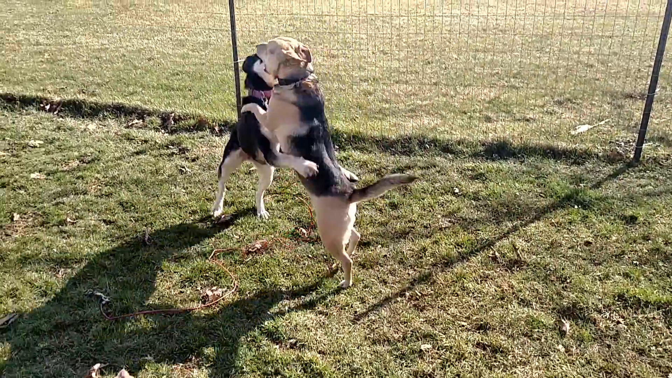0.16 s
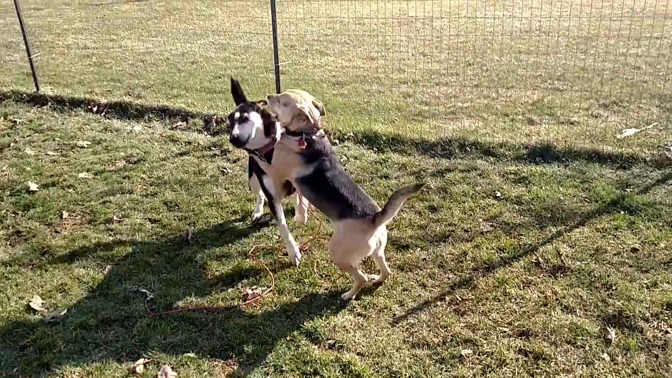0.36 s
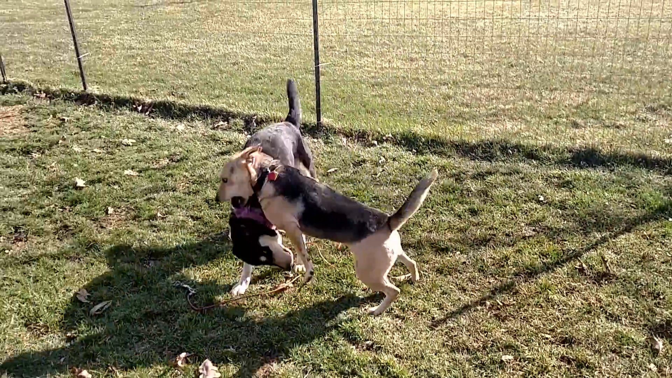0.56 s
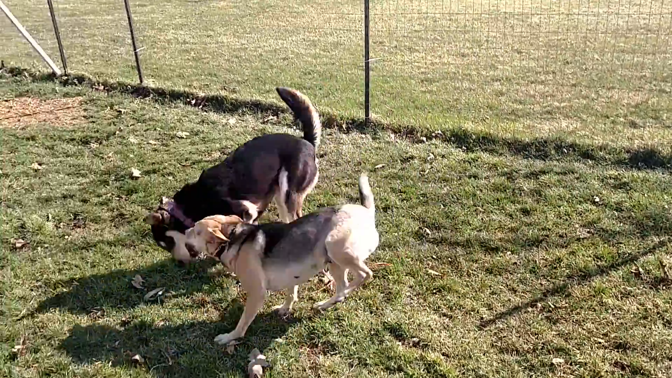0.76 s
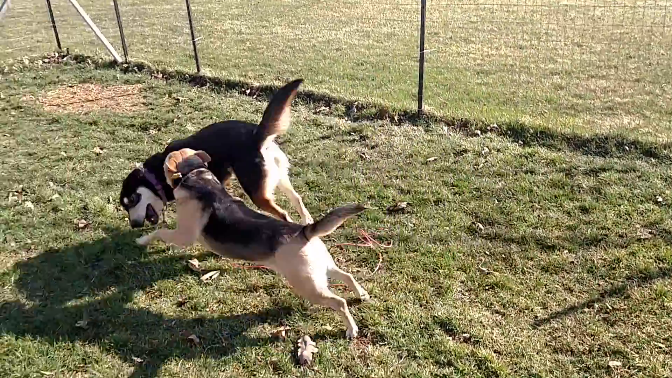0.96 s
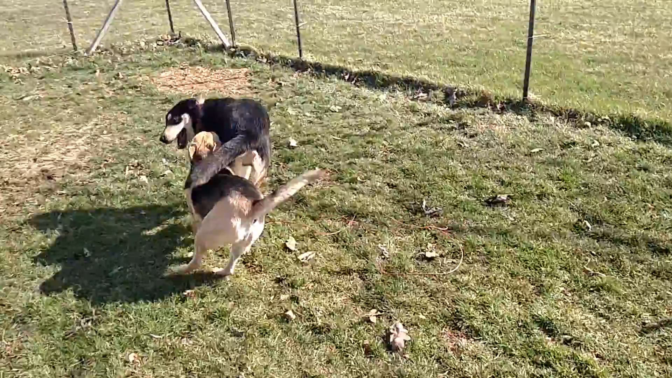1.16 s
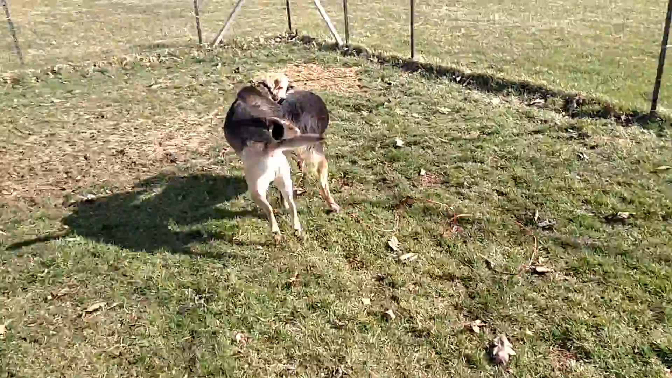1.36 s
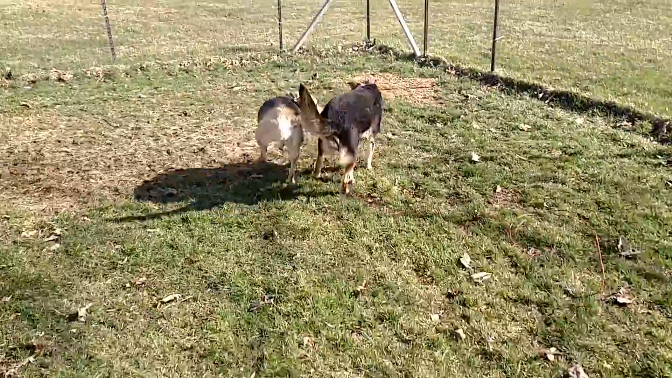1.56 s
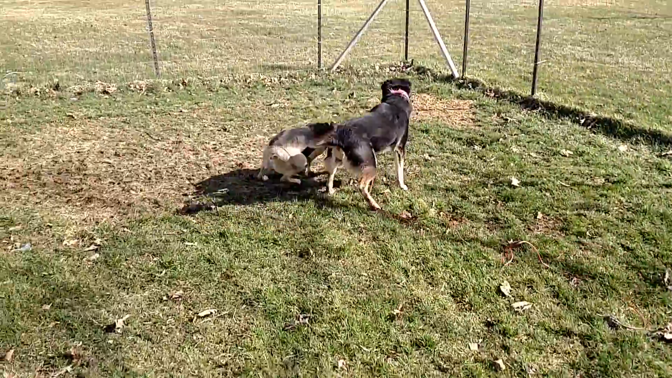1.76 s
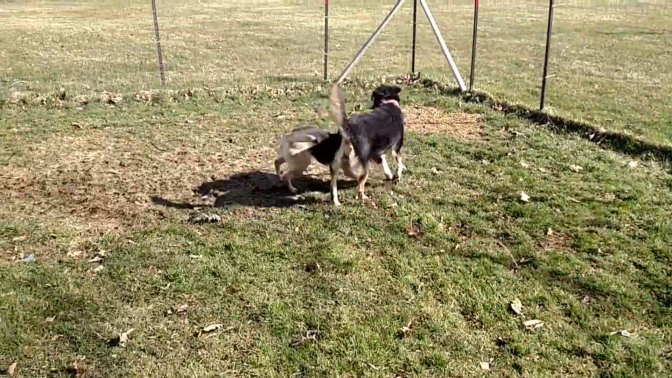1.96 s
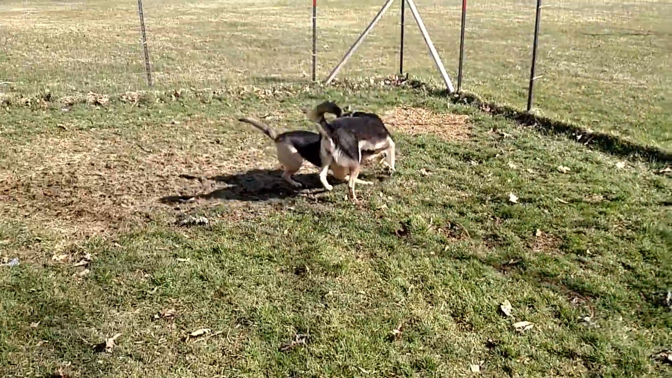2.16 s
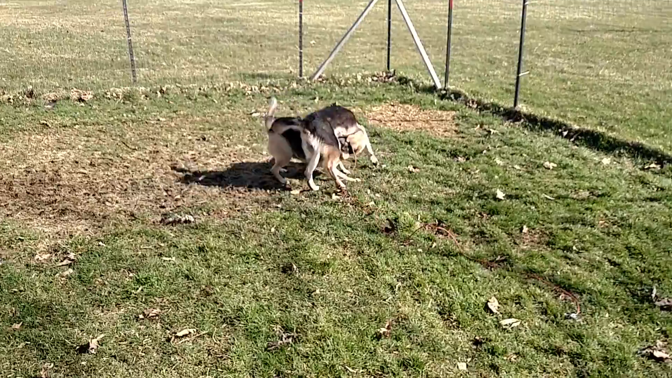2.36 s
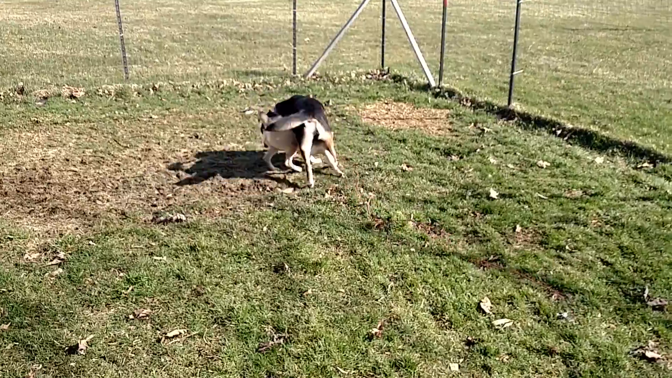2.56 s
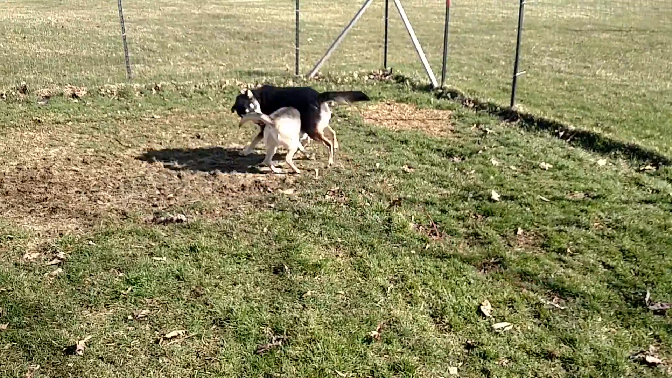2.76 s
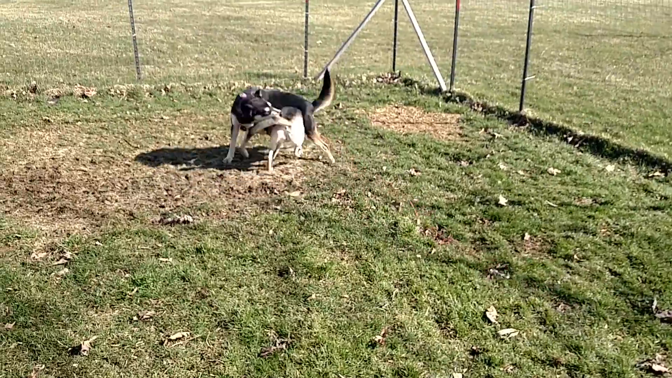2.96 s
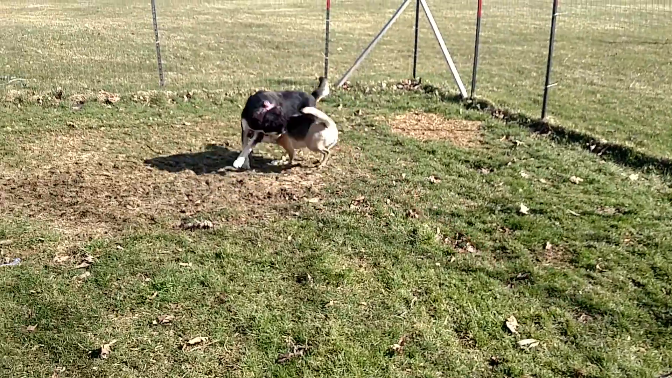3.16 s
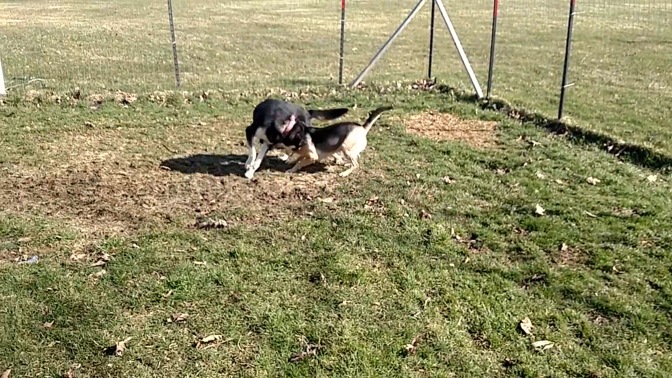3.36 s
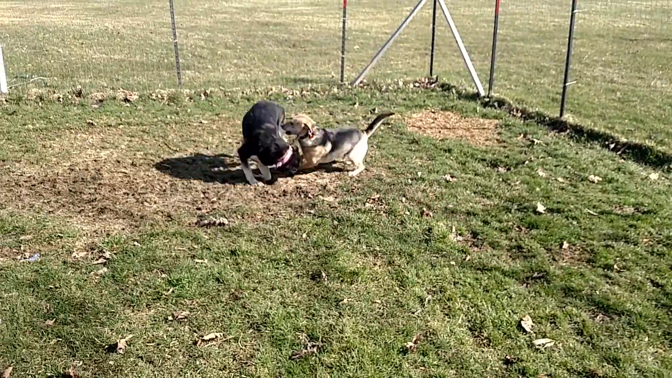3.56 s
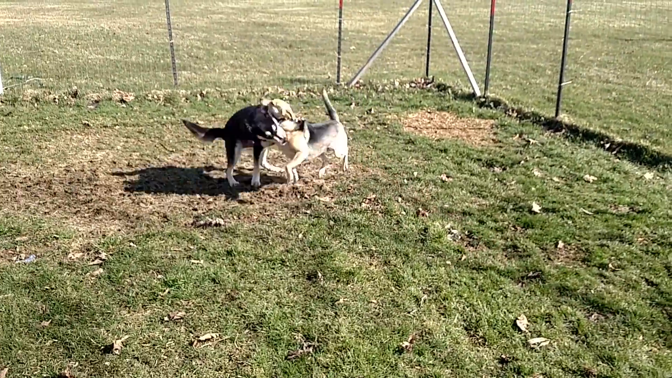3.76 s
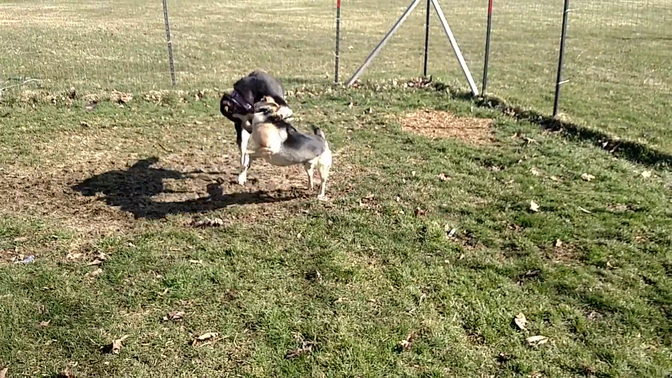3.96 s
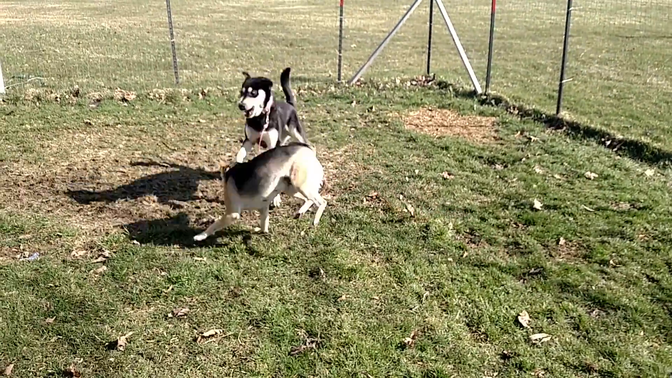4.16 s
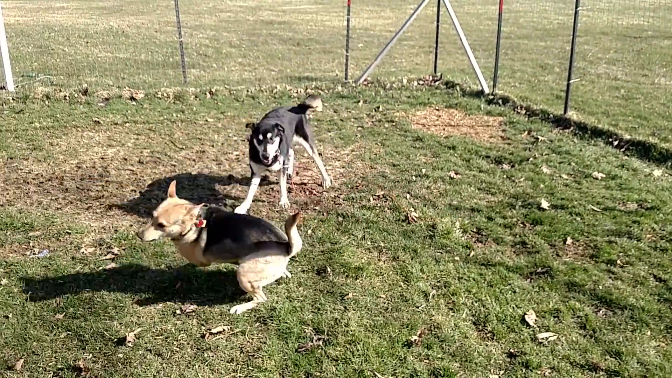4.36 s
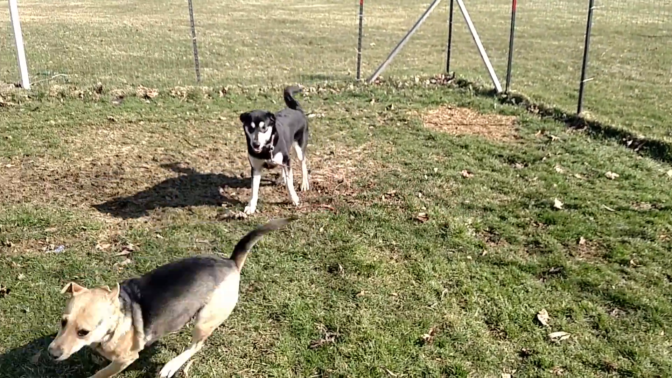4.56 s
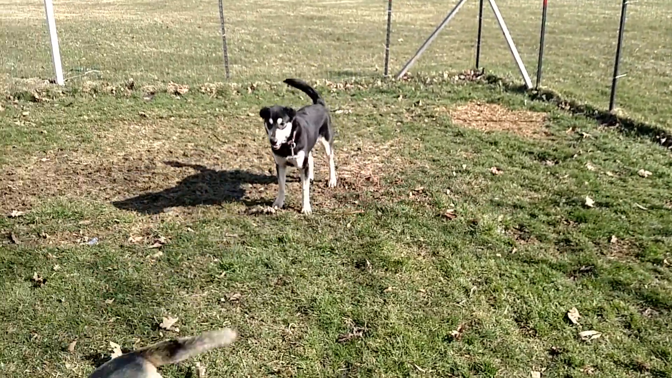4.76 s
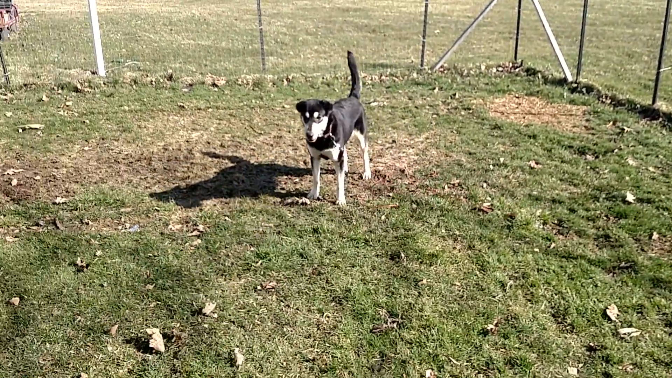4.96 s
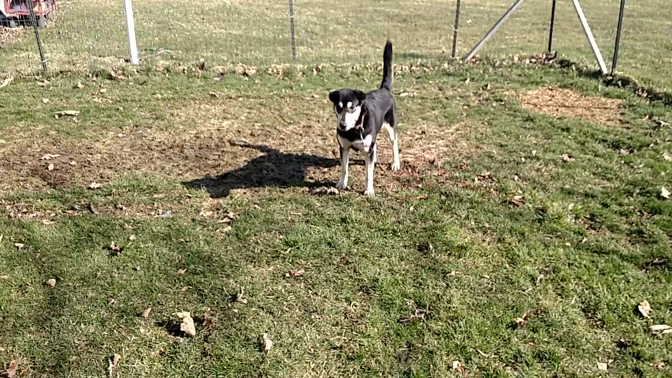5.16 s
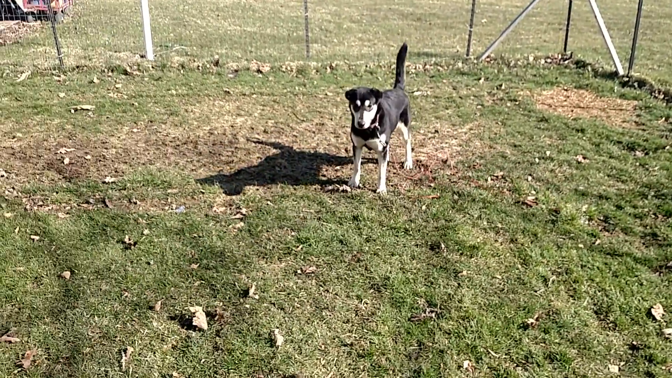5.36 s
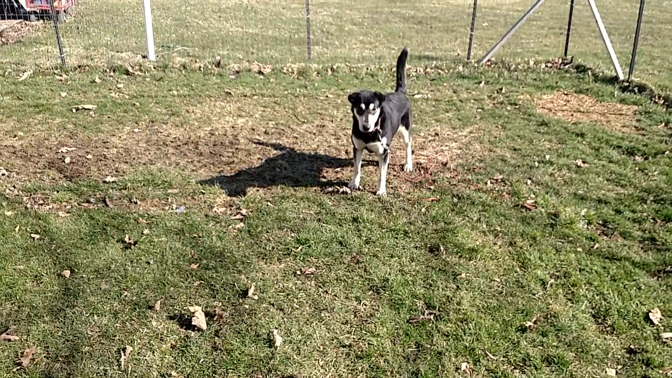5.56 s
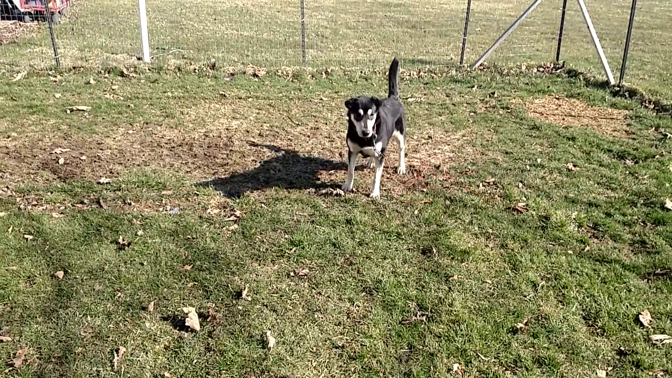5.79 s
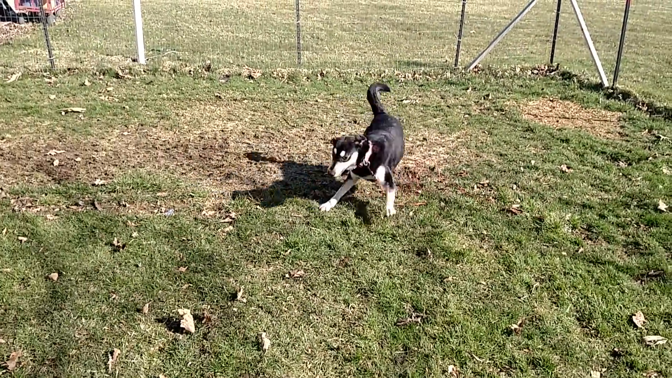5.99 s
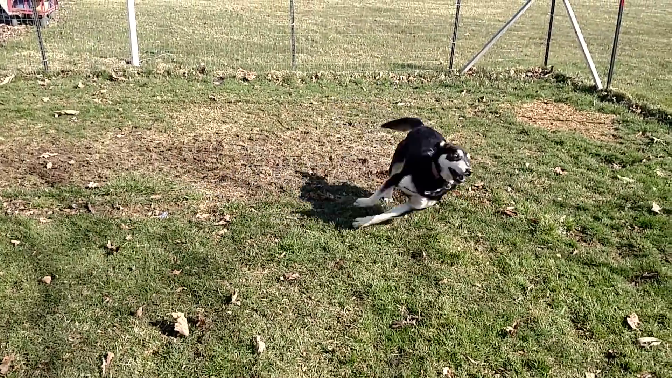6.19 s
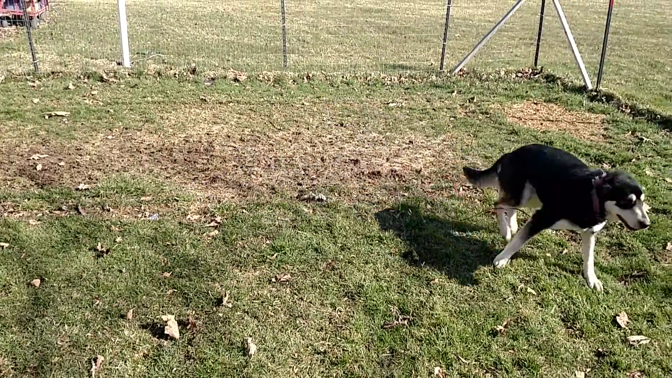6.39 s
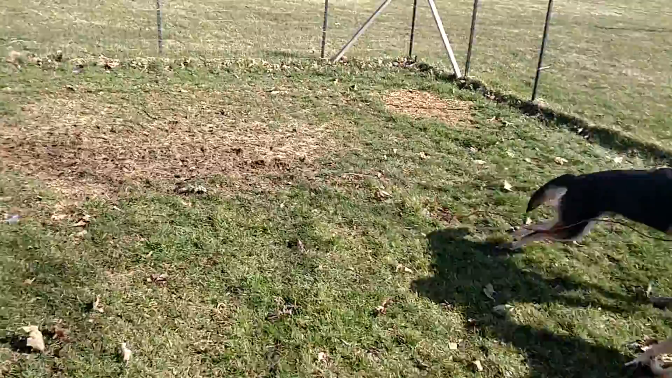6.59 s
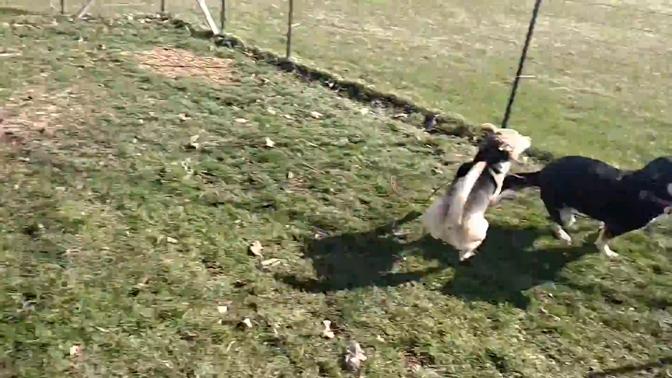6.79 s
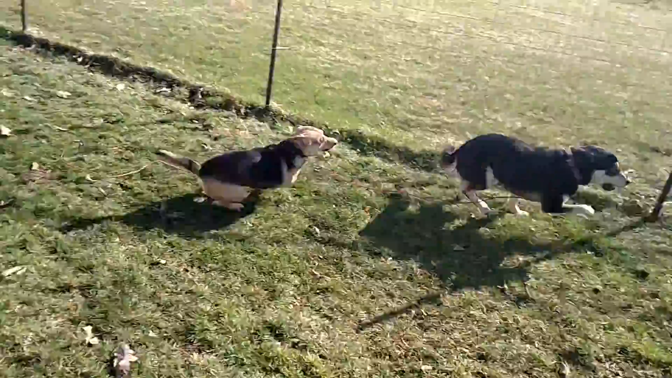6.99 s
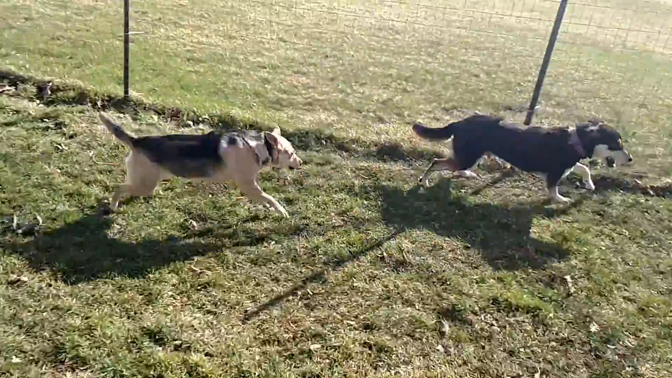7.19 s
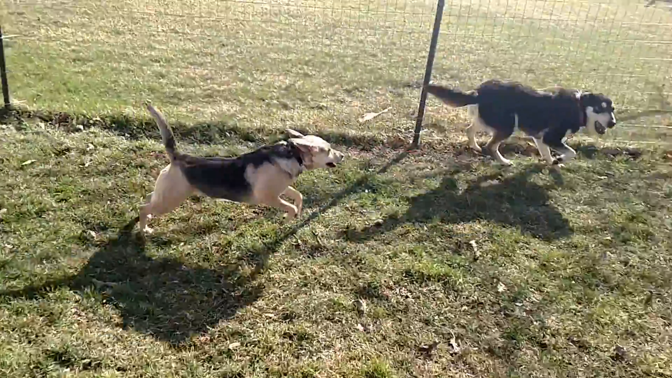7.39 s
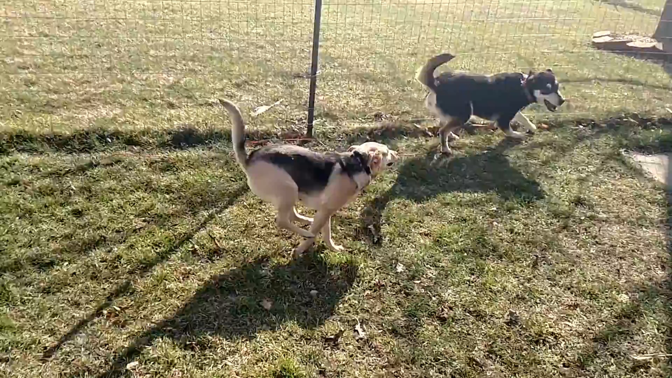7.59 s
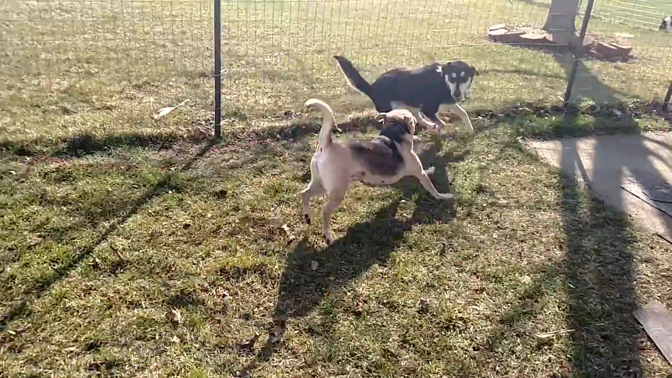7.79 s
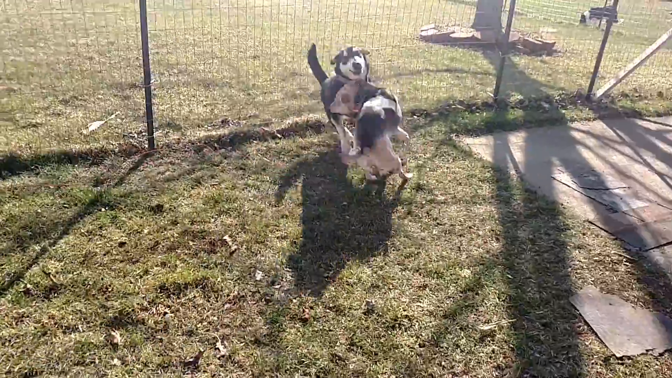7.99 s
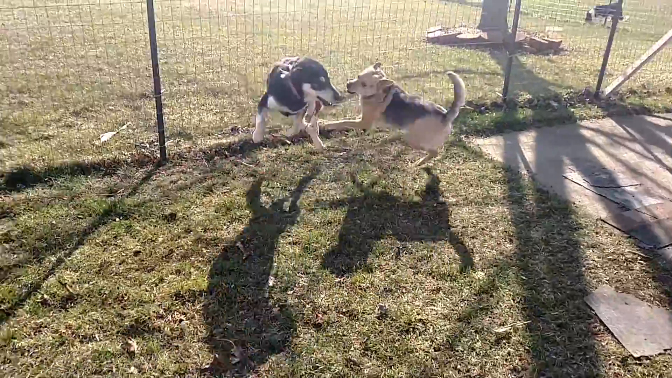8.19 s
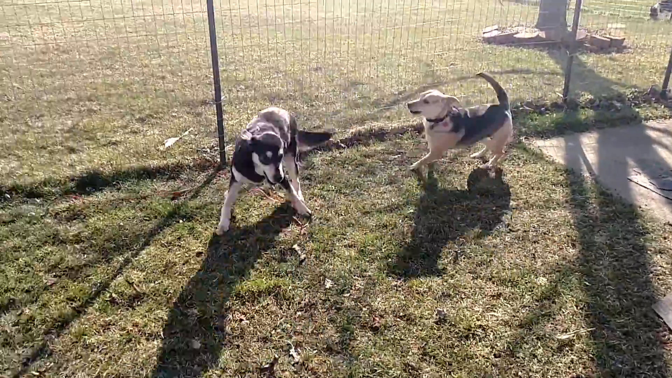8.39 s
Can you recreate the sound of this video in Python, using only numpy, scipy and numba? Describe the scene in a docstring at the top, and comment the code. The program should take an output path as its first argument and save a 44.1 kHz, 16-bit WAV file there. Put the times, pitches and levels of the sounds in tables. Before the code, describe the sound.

Raspy, throaty dog growls tumble over rustling grass outdoors, pause for short breathy pants and microphone buffeting, then flare up again.

```python
"""On a lawn of dry grass two dogs wrestle near the microphone: rough growls in bursts, panting between them.
Growls and pants are flaps and breath noise ringing in throat and mouth cavities; the ground adds a weak echo.
Paws rustle and snap the grass as shaped noise, and a collar tag clinks as ringing metal modes.
Wind buffets the microphone as low noise and single swings; a small bird whistles far off in gliding sines.
Under it all lies a faint outdoor hush of coloured noise."""
import sys
import numpy as np
from scipy import signal
from scipy.fft import rfft, irfft, next_fast_len
from scipy.io import wavfile
from scipy.ndimage import uniform_filter1d
from numba import njit

SR = 44100
rng = np.random.default_rng(int(sys.argv[2]) if len(sys.argv) > 2 else 0)


def boost(x):
    """Linear amplitude factor 10**(x/20) for a level x in decibels (scalar or array-like)."""
    u = np.asarray(x, float) / 20
    return 10 ** u


def transcribe(signal):
    """Save signal, clipped to [-1, 1], as a 16-bit WAV file at the path in sys.argv[1]."""
    frames = np.atleast_2d(signal).T
    limited = np.clip(frames, -1, 1)
    pcm = np.round(limited * 32767).astype(np.int16)
    wavfile.write(sys.argv[1], SR, pcm)


N = 372204

# Growls, level of the mouth resonance: start_s, crest_s, end_s, crest_db, end_db
GROWL_BURSTS = [(0.0, 0.004, 0.265, -26.5, -28.5), (0.268, 0.335, 0.47, -26, -46),
                (0.505, 0.53, 0.81, -34, -41), (0.823, 0.86, 0.935, -23, -31),
                (0.94, 0.955, 1.02, -28, -32), (1.024, 1.04, 1.19, -26, -36),
                (1.193, 1.228, 1.355, -30.5, -38), (1.395, 1.55, 1.655, -34, -43),
                (1.693, 1.71, 2.165, -31, -41), (2.21, 2.23, 2.43, -43, -51),
                (2.495, 2.525, 2.66, -32.5, -52), (2.668, 2.71, 2.985, -39.5, -45),
                (3.098, 3.125, 3.14, -53, -60), (3.187, 3.22, 3.24, -49, -58), (3.34, 3.348, 3.7, -43, -42),
                (3.703, 3.712, 3.762, -37, -43), (3.805, 3.814, 3.94, -41, -56),
                (4.075, 4.092, 4.16, -48.5, -54), (6.262, 6.291, 6.35, -40, -54),
                (6.398, 6.41, 6.56, -34, -32), (6.563, 6.567, 6.73, -39, -39),
                (6.737, 6.745, 6.88, -26.5, -28), (6.922, 6.955, 7.025, -32, -41),
                (7.074, 7.11, 7.16, -41, -53), (7.265, 7.33, 7.365, -36, -43),
                (7.367, 7.37, 7.498, -47, -51), (7.501, 7.56, 7.65, -43, -52),
                (7.738, 7.744, 7.84, -43, -45), (7.872, 7.88, 7.94, -34, -39),
                (7.943, 7.955, 8.104, -37, -35), (8.106, 8.111, 8.28, -18, -26),
                (8.282, 8.284, 8.45, -27, -31)]
# The vocal folds: time_s, mean flap_rate_hz, breath_share (0-1)
FOLD_MOTION = [(0, 100, .4), (.14, 120, .55), (.47, 110, .55), (.5, 55, .45), (.81, 85, .55),
               (.83, 130, .55), (1.36, 120, .5), (1.4, 65, .5), (1.66, 65, .5), (1.7, 120, .4),
               (2.17, 105, .55), (2.2, 50, .55), (2.45, 38, .5), (2.5, 130, .6), (2.56, 110, .55),
               (2.58, 45, .4), (2.74, 125, .5), (3.58, 100, .4), (3.63, 140, .75), (7.35, 130, .6),
               (7.48, 120, .8), (7.53, 35, .5), (7.85, 35, .45), (7.88, 140, .6)]
# The muzzle: time_s, mouth_hz (higher as the jaws open), lips_db (rasp as the lips draw back)
JAW_MOTION = [(0, 966, -4.5), (.11, 964, 0), (.23, 1030, 1), (.33, 930, 1), (.46, 1010, 1),
              (.62, 1080, 8.5), (.8, 910, 13.5), (.83, 713, -5), (.93, 756, 3.5), (1.07, 730, -9),
              (1.27, 725, -6.5), (1.42, 655, 2), (1.52, 690, 1), (1.7, 650, -9), (1.79, 397, -2),
              (1.87, 516, -5), (1.98, 684, -0.5), (2.15, 670, 2.5), (2.42, 565, 3), (2.52, 634, 0),
              (2.72, 660, -2.5), (3.0, 640, 3), (3.33, 600, 1), (3.57, 766, -0.5), (3.68, 1097, 8.5),
              (3.95, 1080, 8), (4.08, 750, -3.5), (6.25, 1090, 14.5), (6.4, 710, 16), (6.55, 707, 3.5),
              (6.7, 570, -7.5), (6.86, 618, -10), (7.03, 720, 8.5), (7.1, 1060, -0.5), (7.28, 770, -4),
              (7.36, 1304, 8), (7.75, 978, 3), (7.88, 840, -6.5), (7.96, 500, -10.5), (8.07, 480, -15),
              (8.11, 1026, -2.5), (8.2, 792, 0.5), (8.3, 634, 1.5), (8.44, 670, 2)]
# How far the larynx drops: time_s, extra_chest_db
LARYNX_DEPTH = [(0, -8), (.34, -9), (.6, 6), (1.04, -3.5), (1.6, 0.5), (1.72, -2), (1.8, -2), (2.22, 5.5),
                (2.42, 1), (2.5, -0.5), (2.85, 1.5), (3.35, 1), (3.75, 4), (3.87, -25), (4.1, 6.5),
                (6.41, 6.5), (6.5, -2), (6.7, 7), (6.82, -17.5), (6.96, 4), (7.33, 7), (7.4, -4),
                (7.6, 8.5), (7.98, -0.5), (8.09, -1), (8.12, -6), (8.44, -4.5)]
# The tongue: time_s, upper_hz (upper resonance), tongue_db (its gain)
TONGUE_MOTION = [(0, 1620, 4.5), (.12, 1500, 5), (.16, 1380, -6.5), (.4, 1600, -8), (.53, 1700, -3),
                 (.68, 2130, 0), (.8, 2050, -12), (.84, 1240, 5), (.92, 1400, 8.5), (.96, 1930, 10),
                 (1.08, 1720, 1), (1.18, 1810, 6.5), (1.25, 2010, 12), (1.35, 2060, 6), (1.43, 1760, 12),
                 (1.52, 1680, -3), (1.62, 1890, 7), (1.7, 1220, 6), (1.85, 1470, -0.5), (2.1, 2470, 5),
                 (2.22, 1850, 1), (2.32, 1730, 10), (2.42, 2000, -5), (2.71, 1390, -9), (2.86, 2140, -2.5),
                 (3.35, 1900, -30), (3.56, 2770, -6), (3.73, 2050, -6.5), (3.9, 1700, -10), (4.1, 1930, 5),
                 (6.25, 1490, -13), (6.43, 1810, -7.5), (6.5, 1850, -7), (6.68, 1480, 10),
                 (6.95, 1810, -0.5), (7.05, 2030, 2), (7.35, 2400, -4.5), (7.5, 2030, -4), (7.8, 2000, 2),
                 (7.97, 1330, 18.5), (8.08, 1380, 19), (8.13, 1780, 6), (8.3, 1750, -6.5), (8.44, 1930, 3)]
# The side resonance drops below the mouth's once the jaws gape: mouth_hz, side_hz
SIDE_RESONANCE = [(860, 1061), (940, 386)]
# Small cavities near teeth and nose: centre_hz
RASP_CAVITIES = [2583, 3630, 4580, 6430]
# Vigour of the scuffle, as rustle: time_s, level_db
SCUFFLE = [(0.0, -50), (0.42, -52), (0.8, -45.5), (1.38, -52), (2.2, -47.5), (2.52, -54), (3.1, -58),
           (3.55, -57.5), (3.75, -47.5), (3.88, -61), (4.82, -53), (5.6, -61), (6.06, -54), (6.6, -46.5),
           (6.93, -46.5), (7.45, -50), (7.71, -54), (7.92, -51), (8.44, -45)]
# Spectrum of the rustle: frequency_hz, density_db (per Hz, relative)
RUSTLE_SPECTRUM = [(40, -13), (120, 22.5), (880, 11), (1500, 14), (1660, 11.5), (2610, 6.5), (3810, -3.5),
                   (6180, -1.5), (14300, -13), (16000, -5)]
# Steady breeze on the microphone: time_s, level_db
BREEZE_LEVEL = [(0, -57), (2.2, -65), (2.4, -67), (3.35, -53), (3.7, -49), (6.8, -52), (7.1, -61),
                (8.44, -70)]
# Gusts: time_s, peak_db, hold_s
GUST_EVENTS = [(0.14, -42.5, 0), (0.88, -30, 0.011), (1.03, -39.5, 0.22), (1.48, -35.5, 0.034),
               (2.1, -37.5, 0), (3.59, -38.5, 0.0), (3.94, -40, 0.0), (4.25, -42, 0.084),
               (4.51, -31.5, 0.11), (4.75, -30, 0.029), (4.92, -28, 0.096), (5.3, -41.5, 0.31),
               (6.02, -45.5, 0.14), (6.62, -39.5, 0.067)]
# Spectrum of the wind's lumps: frequency_hz, density_db (per Hz, relative)
WIND_SPECTRUM = [(13, -53), (22, 12.5), (43, 13), (103, 8), (200, -18), (226, -36), (400, -83), (520, -80),
                 (880, -120)]
# Spectrum of the outdoor hush: frequency_hz, density_db (per Hz, relative)
HUSH_SPECTRUM = [(30, -55), (88, -27), (150, 4), (504, -5.5), (1040, -8), (1980, -10), (14800, -25.5),
                 (16000, -63.5)]
# Blades and leaves snapping: time_s, size_db (strength before the treble band is taken)
BLADE_SNAPS = [(0.015, -35), (0.7966, -38.5), (0.873, -31.5), (0.923, -30.5), (1.051, -35), (1.135, -36.5),
               (1.663, -35.5), (2.253, -34.5), (2.746, -34.5), (3.27, -42.5), (3.575, -47), (3.787, -50),
               (3.824, -32.5), (4.0732, -34.5), (4.481, -39.5), (4.582, -43.5), (4.623, -24), (4.976, -32),
               (6.012, -35), (6.1023, -30), (6.155, -32.5), (6.344, -30), (6.407, -31.5), (6.603, -34.5),
               (6.6494, -30), (6.787, -44), (6.85, -36.5), (7.014, -32.5), (7.2165, -36.5), (7.354, -32.5),
               (7.6139, -37), (8.354, -36.5)]
# Bird whistles, one list each: time_s, pitch_hz, level_db (rms, before flutter)
WHISTLES = [
    [(0.104, 4900, -64), (0.128, 5060, -50.5), (0.2, 5100, -70)],
    [(3.78, 4790, -62), (3.86, 4730, -58), (3.927, 4680, -53.5), (4.065, 4650, -62)],
    [(6.985, 5270, -68), (7.039, 5040, -48), (7.089, 4640, -47), (7.125, 4760, -57)],
    [(7.125, 4840, -61), (7.157, 4760, -66), (7.203, 4774, -57), (7.245, 4700, -76)],
    [(7.275, 4780, -62), (7.291, 4810, -59), (7.359, 4730, -62), (7.37, 4740, -72)],
]
# Single hard flaps of the folds: time_s, strike_db (relative, before the cavities)
HARD_FLAPS = [(0.105, -5.5), (0.145, -15), (0.322, -14), (0.535, -16.5), (0.557, -13), (0.592, -16),
              (0.86, -6.5), (1.038, -11), (1.068, -8.5), (1.458, -12.5), (1.575, -14), (2.639, -22.5),
              (2.668, -19.5), (2.709, -15.5), (3.706, -21.5), (3.786, -19), (6.289, -20.5), (6.743, -18),
              (6.839, -16), (6.955, -7.5), (6.995, -38), (7.564, -20), (7.535, -30.5), (7.594, -22),
              (7.771, -38), (7.822, -42), (8.119, -4.5), (8.148, -10), (8.178, -5.5)]
# Sharp buffets: time_s, peak_db, width_s (one radian of the swing), ringing (share kept per half swing)
SHARP_BUFFETS = [(0.826, -10.5, 0.0011, 0.1), (0.879, -17, 0.0014, 0.35), (1.477, -24.5, 0.0028, 0.5),
                 (3.592, -23, 0.0015, 0), (3.949, -27, 0.0019, 0.4), (4.536, -16.5, 0.0015, 0.67),
                 (4.55, -17.5, 0.00078, 0.83), (4.576, -11.5, 0.00096, 0.5), (4.729, -13, 0.001, 0.25),
                 (4.774, -13, 0.0017, 0.17), (4.84, -5.5, 0.00082, 0.38), (4.917, -10.5, 0.00088, 0.54),
                 (4.988, -9.5, 0.00084, 0.57), (5.052, -22, 0.0012, 0.8), (5.101, -19, 0.0013, 0.57)]
# Collar tag clinks: time_s, strike_db
TAG_STRIKES = [(3.027, -49.5), (3.111, -42), (3.272, -55)]
# Modes of the tag: frequency_hz, gain_db, t60_s
TAG_MODES = [(6200, -9, 0.02), (8700, 3.5, 0.018)]
# Panting: peak_s (the breath has risen to its peak by then and holds), peak_db, mouth_hz, hold_s
PANT_BREATHS = [(4.198, -56, 1740, 0.028), (4.438, -58, 1120, 0.042), (4.624, -38, 1290, 0.071),
                (4.76, -50, 1500, 0.051), (4.961, -39, 1455, 0.038), (5.247, -47.5, 1366, 0.031),
                (5.804, -42, 1380, 0.063), (5.996, -54, 1170, 0.016), (6.094, -56, 1600, 0.037)]

THROAT_HZ = 293


def rms_one(x):
    """Scale to rms 1."""
    return x / np.sqrt(np.mean(x ** 2) + 1e-20)


def in_time(rows):
    """Columns of a table, read at every sample."""
    s, *columns = np.transpose(rows)
    return [np.interp(np.arange(N) / SR, s, column) for column in columns]


def during(start, end, fade=0.011):
    """1 between two times, with short fades (s) outside them."""
    t = np.arange(N) / SR
    return np.clip(np.minimum(t - start, end - t) / fade + 1, 0, 1)


def drift(rate_hz):
    """Slow chance of spread 1: smoothed noise drawn at every 16th sample."""
    r = np.exp(-32 * np.pi * rate_hz / SR)
    noise = rng.standard_normal(N // 16 + 3002)
    slow = signal.lfilter([1], [1, -2 * r, r * r], noise)[3000:]  # drop the filter's start-up
    return np.interp(np.arange(N) / 16, np.arange(len(slow)), rms_one(slow))


def colour(x, spectrum):
    """Give a signal a spectrum; rms 1."""
    hz, db = np.transpose(spectrum)
    size = next_fast_len(N)
    f = np.arange(size // 2 + 1) * SR / size + 1
    gain = boost(np.interp(np.log(f), np.log(hz), db))
    return rms_one(irfft(rfft(x, size) * gain, size)[:N])


def clicks(events):
    """One sample of the given height at each event (time_s, height_db)."""
    out = np.zeros(N)
    out[[round(row[0] * SR) for row in events]] = boost(np.array(events)[:, 1])
    return out


def swells(rows, rise, fall):
    """Events (time_s, peak_db, hold_s) rise, hold and fall at steady rates in dB/s; the loudest rules."""
    t = np.arange(N) / SR
    levels_db = [db - rise * np.maximum(s - t, 0) - fall * np.maximum(t - s - hold, 0)
                 for s, db, hold in rows]
    return np.max(levels_db, axis=0)


@njit
def resonate(x, cosine, r):
    """Two-pole resonance whose centre moves."""
    y = np.zeros(len(x))
    for i in range(2, len(x)):
        y[i] = x[i] - x[i - 2] + 2 * r * cosine[i] * y[i - 1] - r * r * y[i - 2]
    return y


def cavity(source, hz, width_hz):
    """A cavity rings three times over, which keeps the valleys beside it dark."""
    cosine = np.cos(2 * np.pi * hz * np.ones(N) / SR)
    r = np.exp(-np.pi * width_hz / SR)
    gain = (1 - r * r) / 2
    y = source
    for _ in range(3):
        y = resonate(gain * y, cosine, r)
    return y / gain * gain


def tract(source, hz, width_hz, even_s=0.038):
    """A cavity whose slow level is evened out to about 1."""
    y = rms_one(cavity(source, hz, width_hz))
    return y / np.sqrt(uniform_filter1d(y ** 2, int(even_s * SR)) + 0.00079)


def folds(spread_db):
    """Slack folds flap unevenly and never close: breath swells at each flap and leaks between them."""
    rate_hz, breath = in_time(FOLD_MOTION)
    unevenness = np.exp(0.75 * breath * drift(90) + 0.12 * drift(12))
    phase = np.cumsum(rate_hz * unevenness) / SR
    strength_db = spread_db * (drift(20) + 0.8 * rng.standard_normal(N))
    flaps = np.diff(np.floor(phase), prepend=0) * boost(strength_db) * np.sqrt(SR / rate_hz)
    swell = rms_one(signal.fftconvolve(flaps, np.hanning(int(0.010 * SR)), "same"))
    puffs = rms_one((swell + 2 * breath) * rng.standard_normal(N))
    source = np.sqrt(1 - breath) * rms_one(flaps) + np.sqrt(breath) * puffs
    return source, puffs


def growls():
    """Flaps and breath from the folds excite cavities that shift as jaws, tongue, lips and larynx move."""
    points = []
    for start, crest, end, crest_db, end_db in GROWL_BURSTS:
        points += [(start, crest_db - 9.5), (crest, crest_db), (end, end_db)]
    mouth_db, = in_time(points)
    effort = np.clip(mouth_db + 34.5, -20, 20)  # dB over an easy growl
    mouth_hz, lips_db = in_time(JAW_MOTION)
    upper_hz, tongue_db = in_time(TONGUE_MOTION)
    side_hz = np.interp(mouth_hz, *np.transpose(SIDE_RESONANCE))
    # harder growls move out of the chest; closed jaws favour it
    chest_db = -10 - 0.29 * effort - 7.5 * np.log2(mouth_hz / 750) + in_time(LARYNX_DEPTH)[0]
    bright_db = -9.5 - 0.2327 * effort + lips_db  # shared by upper resonance and rasp
    # a side resonance far above the mouth is weak
    apart = np.clip(np.log2(side_hz / mouth_hz) - 0.5, 0, 0.5)
    side_db = -8.5 + 0.097 * lips_db - 32 * apart + 2 * drift(34)
    upper_db = bright_db + tongue_db - 3 + 2.5 * drift(26.6)

    source, breath = folds(spread_db=2.2)
    voice = tract(source, mouth_hz * np.exp(0.055 * drift(30)), width_hz=370)
    voice -= boost(side_db) * tract(source, side_hz, width_hz=590)
    voice -= boost(chest_db - 3) * tract(source, THROAT_HZ, width_hz=269)
    voice += boost(chest_db) * tract(source, 155.5, width_hz=229)
    wandering_hz = upper_hz * np.exp(0.078 * drift(25.5))
    voice += boost(upper_db) * tract(source + breath, wandering_hz, width_hz=630)
    for k, hz in enumerate(RASP_CAVITIES):
        rasp_db = 0.94 * bright_db - 15.5 - 3.64 * k + 5 * drift(14)
        voice += boost(rasp_db) * tract(breath, hz * np.exp(0.07 * drift(10)), width_hz=0.27 * hz)
    sounding = sum(during(row[0], row[2], fade=0.0011) for row in GROWL_BURSTS)
    return voice * boost(mouth_db) * np.minimum(sounding, 1)


def grass_rustle():
    """Paws in dry grass: dense clumped crackle of random sizes over plain noise."""
    sizes = boost(6 * np.minimum(rng.exponential(1, N), 4)) * rng.choice([-1, 1], N)
    born = rng.random(N) < 2500 * boost(9 * drift(20)) / SR  # around 2500 per s, in clumps
    crackle = sizes * born + rng.standard_normal(N)
    return colour(crackle, RUSTLE_SPECTRUM) * boost(in_time(SCUFFLE)[0])


def wind():
    """Lumpy low turbulence at the microphone; strong gusts also flutter higher."""
    gusts_db = swells(GUST_EVENTS, rise=97, fall=65)
    db = np.maximum(in_time(BREEZE_LEVEL)[0], gusts_db)
    turbulence = rng.standard_normal(N) * boost(8.4 * drift(28.6))
    lumps = colour(turbulence, WIND_SPECTRUM) * boost(db)
    flutter = tract(rng.standard_normal(N) * boost(11 * drift(16)), 108, width_hz=140)
    return lumps + flutter * boost(2.26 * (db + 31) - 28)


def hush():
    """Faint steady outdoor noise."""
    return boost(-64.5) * colour(rng.standard_normal(N), HUSH_SPECTRUM)


def grass_snaps():
    """A blade creaks up to its break and dies away, as noise under a rising and falling envelope."""
    t = np.arange(N) / SR - 0.004  # peaks come 4 ms after the table's times
    shape = np.zeros(N)
    for s, db in BLADE_SNAPS:
        t60 = 0.022 * boost(0.5 * (db + 52))  # bigger snaps drag on longer
        at = round(s * SR)
        near = slice(max(at - SR // 20, 0), at + SR // 4)
        after = t[near] - s
        shape[near] += boost(db - 60 * np.maximum(after / t60, -after / (0.49 * t60)))
    bursts = shape * rng.standard_normal(N) * boost(7.4 * drift(220) - 9)
    return signal.sosfilt(signal.butter(1, [1800, 8000], "band", fs=SR, output="sos"), bursts)


def bird():
    """Thin gliding whistles, far off, that flutter a little in level."""
    out, flutter_db = np.zeros(N), 2.8 * drift(40)
    for note in WHISTLES:
        hz, db = in_time(note)
        tone = np.sin(2 * np.pi * np.cumsum(hz) / SR)
        out += np.sqrt(2) * boost(db + flutter_db) * during(note[0][0], note[-1][0]) * tone
    return out


def hard_flaps():
    """Single hard flaps of the folds strike the mouth, throat and upper cavities."""
    mouth_hz, upper_hz = in_time(JAW_MOTION)[0], in_time(TONGUE_MOTION)[0]
    strikes = clicks(HARD_FLAPS) + 1e-18 * rng.standard_normal(N)  # inaudible floor
    ring = cavity(strikes, mouth_hz, width_hz=470)
    ring += boost(-11.5) * cavity(strikes, THROAT_HZ, width_hz=360)
    ring -= boost(-21) * cavity(strikes, upper_hz, width_hz=950)
    return boost(29) * ring


def buffets():
    """Each buffet throws the microphone membrane one way; it swings back and may ring on a few times."""
    lead = 300  # samples before the peak
    out, t = np.zeros(N), np.arange(-lead, 1500) / SR
    for s, db, width, ringing in SHARP_BUFFETS:
        rise = np.exp(-0.5 * (t / (2 * width)) ** 2)
        decay = np.clip(ringing, 0.05, 0.9) ** (t / (np.pi * width))
        fade = np.where(t < 0, rise, decay)
        at = round(s * SR) - lead
        out[at:at + len(t)] -= boost(db) * fade * np.cos(t / width)
    return out


def collar_tag():
    """Each clink strikes the modes of the little metal plate."""
    out, strikes = np.zeros(N), clicks(TAG_STRIKES) + 1e-18
    for hz, db, t60 in TAG_MODES:
        r, w = boost(-60 / (t60 * SR)), 2 * np.pi * hz / SR
        out += boost(db) * signal.lfilter([0, np.sin(w)], [1, -2 * r * np.cos(w), r * r], strikes)
    return out


def pants():
    """Unvoiced air rushes through the open mouth and rings in its cavities."""
    db = swells([(s, peak, hold) for s, peak, _, hold in PANT_BREATHS], rise=898, fall=352)
    mouth_hz = in_time(PANT_BREATHS)[1] * np.exp(0.06 * drift(20))
    air = rng.standard_normal(N) * boost(5.3 * drift(30))
    sound = tract(air, mouth_hz, width_hz=183)
    sound -= boost(-9.5) * tract(air, 1690, width_hz=580)
    sound += boost(-13) * tract(air, 1750, width_hz=2700)
    sound -= boost(-6) * tract(air, 780, width_hz=1230)
    sound += boost(-17) * tract(air, 4330, width_hz=1300)
    sound += boost(-25) * tract(air, 2550, width_hz=590)
    return sound * boost(db)


def scene():
    """Dogs with one weak echo from the ground, among grass, tag, wind, bird and hush."""
    dogs = growls() + hard_flaps() + pants()
    dogs[150:] += boost(-25) * dogs[:-150]  # 150 samples = 3.4 ms later
    grass = grass_rustle() + grass_snaps()
    air = wind() + buffets() + hush()
    return (dogs + grass + air + bird() + collar_tag())[None]


def low_pass(x):
    """Removes everything above the highest recorded frequency."""
    return signal.sosfilt(signal.butter(12, 16420, fs=SR, output="sos"), x)


def record(dry):
    """A small microphone with a steep cut at the top, 50 dB down from 16 kHz."""
    mix = signal.sosfilt(signal.cheby2(12, 50, 16000, fs=SR, output="sos"), dry)
    return low_pass(mix)


dry = scene()
out = record(dry)
transcribe(out)
```